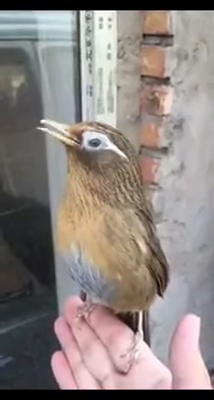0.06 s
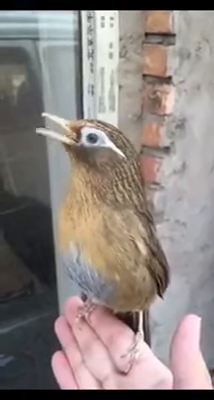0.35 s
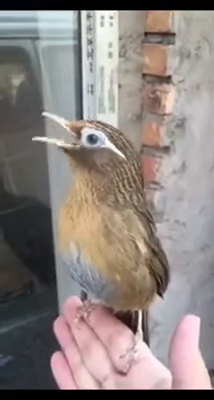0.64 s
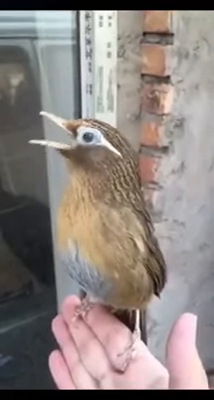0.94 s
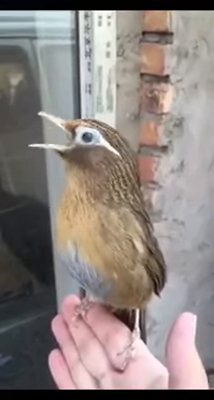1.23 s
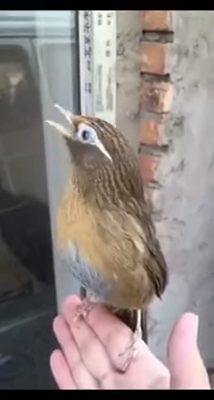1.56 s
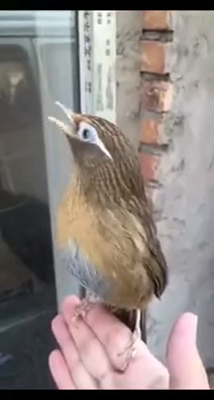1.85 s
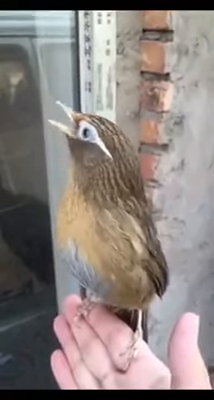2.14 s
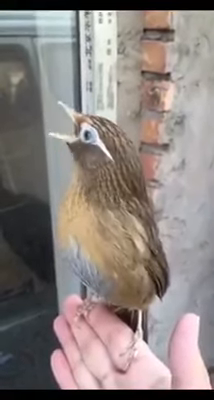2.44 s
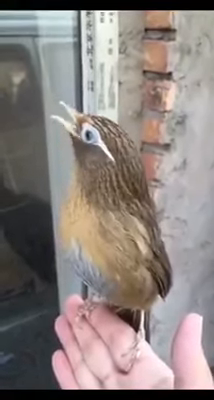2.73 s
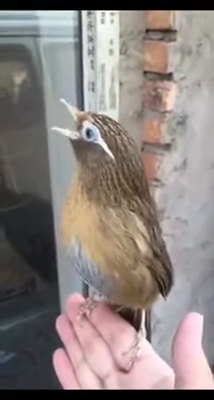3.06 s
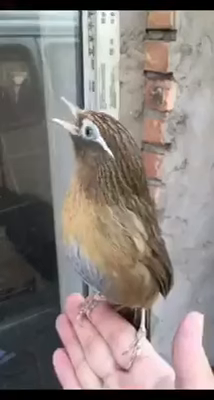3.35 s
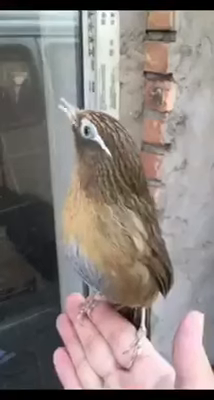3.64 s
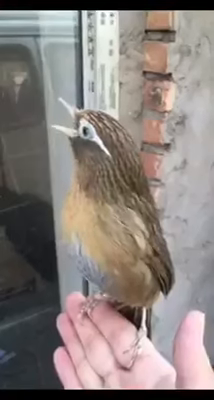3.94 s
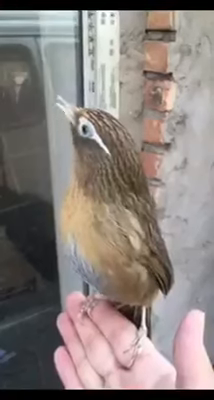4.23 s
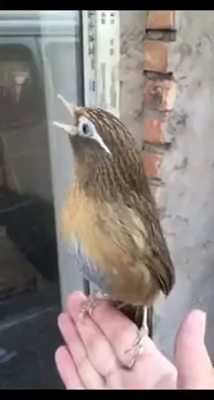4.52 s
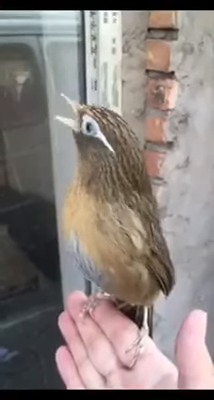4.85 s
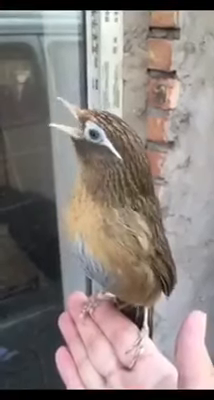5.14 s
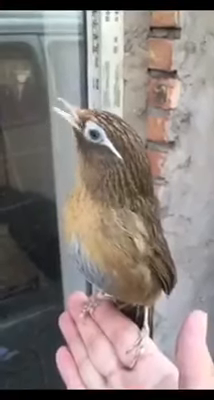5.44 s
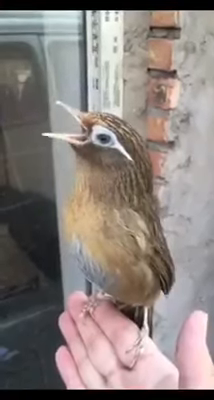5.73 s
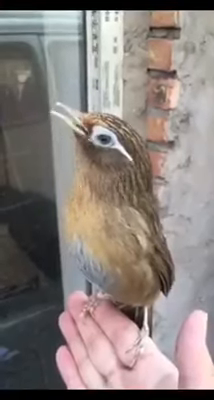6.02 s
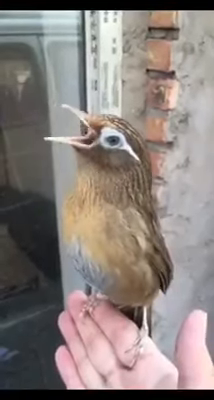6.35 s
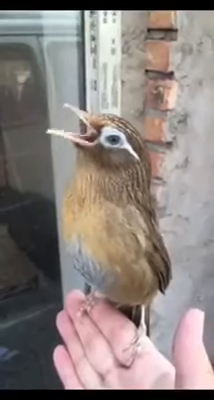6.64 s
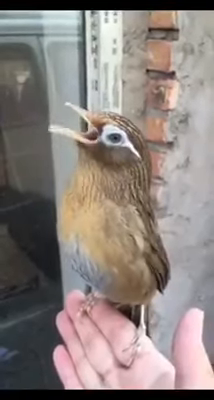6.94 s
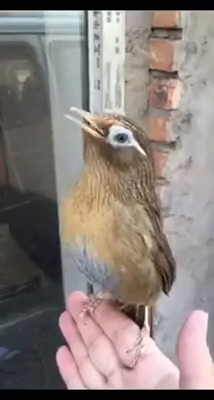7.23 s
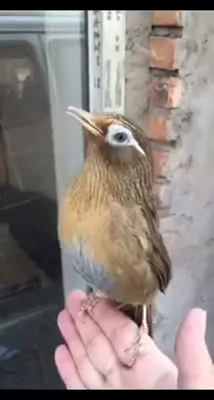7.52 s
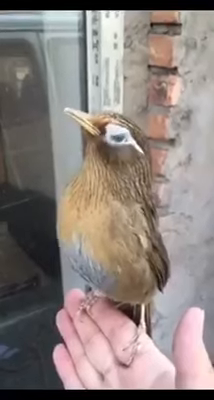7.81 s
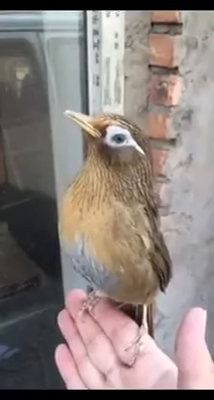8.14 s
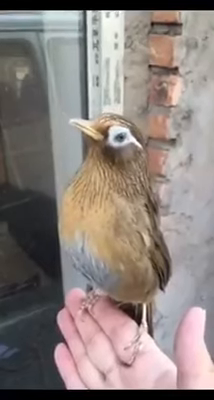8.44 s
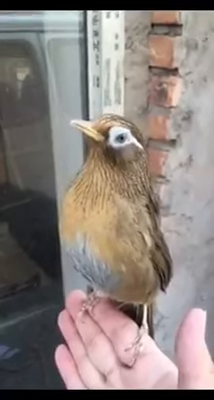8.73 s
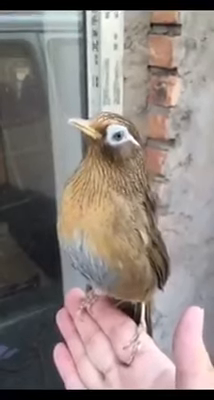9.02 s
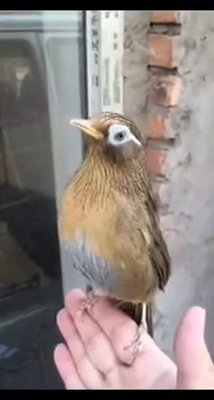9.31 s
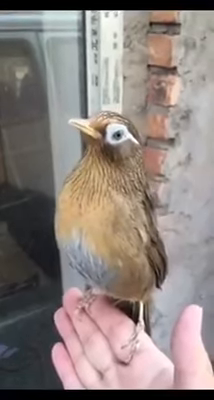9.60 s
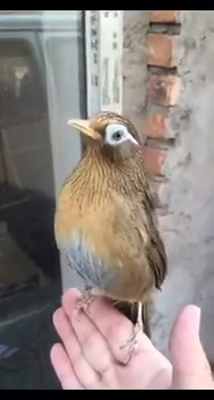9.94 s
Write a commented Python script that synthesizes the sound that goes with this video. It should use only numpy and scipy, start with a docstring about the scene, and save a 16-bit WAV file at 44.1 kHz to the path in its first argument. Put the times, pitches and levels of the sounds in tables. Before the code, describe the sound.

A songbird sings loudly, close to the microphone, with a short echo from nearby walls. From the start to about 3.5 seconds it delivers quick, high notes: soft arched calls, plunging trills, buzzy climbs and wobbling upward swoops, almost pure in tone with a slight breathy edge. From 3.5 to 5.5 seconds it repeats a pattern of a short chip, an upward leap and a falling trill. From about 5.7 seconds it sings harder, alternating clear, slightly rising whistles with drooping trills and sharp leaping notes, and stops at 7.3 seconds. From 7.7 to 9.8 seconds a farther bird answers with about a dozen much quieter, curving, buzzy chirps. A faint low rumble and a wash of air continue underneath, with soft, dull rustles around 8 and 9.2 seconds.

```python
"""Near some walls, a hwamei (a songbird) perched on a hand sings close by: quick trilled sweeps,
then long swooping whistles. Its voice organ, the syrinx, makes an almost pure tone that slides and
shakes in pitch; faint overtones and hiss surround it. It repeats a small stock of notes, and the
walls throw them back. When it stops, a farther bird answers over a low rumble and soft rustles."""
import sys
import numpy as np
from scipy import signal
from scipy.fft import rfft, irfft, next_fast_len
from scipy.io import wavfile
from scipy.ndimage import uniform_filter1d, minimum_filter1d

SR = 44100
rng = np.random.default_rng(int(sys.argv[2]) if len(sys.argv) > 2 else 0)


def master_out(mix):
    """Clip the mix to full scale and print it as 16-bit PCM to the path in sys.argv[1]."""
    frames = np.transpose(np.atleast_2d(mix))
    ceiling = np.clip(frames, -1, 1)
    pcm = np.round(ceiling * 32767).astype(np.int16)
    wavfile.write(sys.argv[1], SR, pcm)


N = 439677

# Breathy hiss around each note, with a bright top at 8-11 kHz: f/Hz, relative level/dB
HISS_SPECTRUM = [(400, -29), (1000, -19.5), (1500, -1.5), (2400, 14), (4200, -5), (5200, -1), (6300, 6.5),
                 (7000, -28), (7900, -8), (9500, -2), (11200, -6), (12400, -14)]


def amp(db):
    """Turns decibels into a factor to multiply a sound by."""
    return 10 ** (np.asarray(db) / 20)


def unit_level(x):
    """Scales a signal so that its average size (rms) is 1."""
    return x / np.sqrt(np.mean(x ** 2) + 1e-20)


def value_at(points, hz):
    """Reads between the rows of a (frequency, value) table, on a log-frequency axis."""
    f, value = np.transpose(points)
    return np.interp(np.log(hz + 1), np.log(f + 1), value)


def add(mix, start_s, sound):
    """Mixes a sound in at the given time."""
    part = mix[max(round(start_s * SR), 0):][:len(sound)]
    part += sound[:len(part)]


def waver(size, hz):
    """Random wavering of average size 1, mostly slower than hz."""
    padded = next_fast_len(size + 2048)
    f = np.fft.rfftfreq(padded, 1 / SR)
    slow = rfft(rng.standard_normal(padded)) / (1 + (f / hz) ** 2)
    return unit_level(irfft(slow, padded))[:size]


def noise(spectrum, size=N):
    """Noise of average size 1 with the given balance of low and high frequencies."""
    padded = next_fast_len(size)
    gain = amp(value_at(spectrum, np.fft.rfftfreq(padded, 1 / SR)))
    return unit_level(irfft(rfft(rng.standard_normal(padded)) * gain, padded)[:size])


def fade(t, edge_s):
    """Soft start and stop of a sound."""
    return np.sin(np.pi / 2 * np.clip(np.minimum(t, t[-1] - t) / edge_s, 0, 1)) ** 2


def reverb(x, stretch, build_s):
    """The surroundings ring on in a blur of echoes; high frequencies die first."""
    # f/Hz, time to die away by 60 dB before stretching/s
    ring_times = [(1000, 1), (2800, 0.89), (4000, 0.83), (11000, 0.048)]
    reflections = rng.standard_normal(SR) * (rng.random(SR) < .1)
    hz, t, bands = signal.stft(reflections, SR, nperseg=256)
    ring_s = stretch * value_at(ring_times, hz)[:, None]
    tail = signal.istft(bands * amp(-60 * t / ring_s), SR, nperseg=256)[1]
    tail *= 1 - np.exp(-(np.arange(len(tail)) / SR / build_s) ** 2)
    return signal.fftconvolve(x, tail / np.linalg.norm(tail))[:N]


def background(drift_db=1.93):
    """Low rumble and a wash of air, drifting a little in loudness together."""
    # Both: f/Hz, relative level/dB
    rumble_spectrum = [(15, -42.5), (25, -23), (33, -25), (41, 7), (47, 4.5), (56, 5), (74, -14), (92, 2),
                       (115, -9.5), (157, -18), (260, -47), (440, -100)]
    air_spectrum = [(88, -27), (150, -12), (200, -4), (300, -4.5), (420, -8), (520, -14), (680, -13),
                    (900, -13.5), (1330, -9), (2500, -10.5), (3450, -21), (4500, -23), (5500, -28.5),
                    (7850, -28.5), (13000, -53.5)]
    steady = amp(-44.5) * noise(rumble_spectrum) + amp(-54.5) * noise(air_spectrum)
    return steady * amp(drift_db * waver(N, 2.9))


def rustles():
    """Brief, uneven swells of dull noise."""
    # start/s, length/s, rough band centre/Hz, level/dB
    swells = [(4.426, 0.19, 421, -48.5), (8.011, .17, 610, -51), (9.154, 0.317, 244, -51.5),
              (9.165, 0.28, 685, -54.5)]
    out = np.zeros(N)
    for start, length, hz, db in swells:
        t = np.arange(0, length, 1 / SR)
        band_filter = signal.butter(2, [hz / 1.9, hz * 1.4], "bandpass", fs=SR)
        band = unit_level(signal.lfilter(*band_filter, rng.standard_normal(len(t))))
        add(out, start, amp(db + 2.9 * waver(len(t), 30)) * band * fade(t, 0.059))
    return out


def far_bird(buzz=0.043, buzz_hz=130, rasp=0.021):
    """Curving, buzzy notes, about half direct sound and half echo; high notes are the raspiest."""
    # start/s, length/s, first pitch/Hz, middle pitch/Hz, last pitch/Hz, relative level/dB
    answer_notes = [(7.702, 0.11, 1907, 1786, 1658, -50.5), (7.921, 0.15, 2040, 1936, 1954, -56.5),
                    (8.046, 0.11, 1836, 2076, 2175, -41), (8.254, 0.092, 2383, 2497, 2570, -42.5),
                    (8.348, 0.029, 2790, 3040, 3260, -30), (8.526, 0.094, 5730, 4730, 4230, -45.5),
                    (8.689, .11, 3530, 4070, 4300, -42.5), (8.812, 0.11, 3650, 2950, 2740, -39.5),
                    (9.036, 0.12, 2263, 2526, 2850, -36.5), (9.172, 0.16, 2810, 2680, 2420, -35.5),
                    (9.532, 0.092, 3320, 3710, 4280, -40), (9.681, 0.075, 3590, 2957, 2690, -36.5)]
    song = np.zeros(N)
    for start, length, first, middle, last, db in answer_notes:
        t = np.arange(0, length, 1 / SR)
        hz = np.polyval(np.polyfit([0, .5, 1], [first, middle, last], 2), t / length)
        hz *= 1 + hz / 3000 * (buzz * np.sin(2 * np.pi * buzz_hz * t) + rasp * waver(len(t), 510))
        phase = 2 * np.pi * np.cumsum(hz) / SR
        tone = np.sin(phase) + amp(-35.5) * np.sin(2 * phase)
        voice = tone + amp(-28) * noise(HISS_SPECTRUM, len(t))
        add(song, start, amp(db) * fade(t, 0.022) * voice)
    return amp(-5) * song + amp(-5.5) * reverb(song, stretch=0.51, build_s=0.014)


def hiss(hz, level_db, depth_hz):
    """Breathy hiss, stronger when a note is loud, trilled, far from mid pitch or falling fast."""
    octaves_off = np.abs(np.log2(hz / 2600))
    fall = np.maximum(-np.gradient(np.log2(hz)) * SR, 0)  # octaves per second
    rough_db = np.maximum(14 * np.tanh(depth_hz / 170), 15 * np.tanh(fall / 35))
    calm_db = .4 * level_db - 62
    hiss_db = calm_db + rough_db + 16 * octaves_off
    return amp(hiss_db + 2 * waver(len(hz), 150)) * noise(HISS_SPECTRUM, len(hz))


def fizz(hz, level_db, depth_hz, above_hz=5400, width_hz=330):
    """A narrow, bright fizz that rises and falls high above the sliding tone."""
    fizz_db = -54 + 0.47 * level_db + 13 * np.tanh(depth_hz / 120) + 17 * np.log2(hz / 2600)
    phase = 2 * np.pi * np.cumsum(hz + above_hz) / SR
    return amp(fizz_db) * waver(len(hz), width_hz) * np.sin(phase)


def overtones(phase, hz, flutter_db=4, blur_radians=0.3):
    """Faint, fluttering multiples of the pitch; half multiples come from strong and weak cycles."""
    # Made by the syrinx: multiple of the pitch, relative level/dB
    multiples = [(.5, -49), (1.5, -28.5), (2, -28), (2.5, -49.5), (3, -45.5), (3.5, -58), (4, -46)]
    # How bright the overtones sound at each frequency: f/Hz, gain/dB
    overtone_balance = [(800, -8), (1500, -1.5), (3500, -14), (4300, -19), (5000, -12), (5500, -7.5),
                        (6200, 2.5), (7000, -18.5), (7900, 5), (9000, 8.5), (11200, -4.5), (12400, -11.5)]
    out = np.zeros(len(hz))
    for multiple, db in multiples:
        gain = amp(db + flutter_db * waver(len(hz), 40) + value_at(overtone_balance, multiple * hz))
        wave = np.sin(multiple * phase + blur_radians * waver(len(hz), 310))
        out += gain * wave * (multiple * hz < SR / 2)
    return out


def syrinx(t, line_hz, level_db, depth_hz=0, trill_hz=0, *, bright_db, noise_db):
    """One breathy note: the pitch follows line_hz, and a trill swings it up and down by depth_hz."""
    # The tone carries best in the middle of the bird's range: f/Hz, gain/dB
    carrying = [(1500, -9.5), (1800, -6.5), (2200, -3.5), (2800, 0), (3500, -3), (4000, -5.5),
                (4500, -13.5), (5300, -12)]
    level_db = level_db + value_at(carrying, line_hz)
    trill = np.sin(2 * np.pi * np.cumsum(trill_hz * (1 + .017 * waver(len(t), 43))) / SR)
    # the harder the trill and the higher the note, the less steady the pitch
    swing_hz = depth_hz * (trill + 0.15 * waver(len(t), 450))
    shake = 0.0015 * (line_hz / 2600) ** 4 * waver(len(t), 400)
    hz = line_hz * (1 + shake) + swing_hz
    phase = 2 * np.pi * np.cumsum(hz) / SR
    tone = np.sin(phase) * (1 + amp(-52) * waver(len(t), 1300))
    tone += amp(bright_db) * overtones(phase, hz)
    # the tone weakens at the top of each trill swing
    pulse = np.maximum(1 - swing_hz / 620, .1) / np.sqrt(1 + (depth_hz / 800) ** 2)
    haze = hiss(line_hz, level_db, depth_hz) * fade(t, .007) + fizz(hz, level_db, depth_hz)
    return (np.sqrt(2) * amp(level_db) * pulse * tone + amp(noise_db) * haze) * fade(t, .003)


def swell(t, attack_s, release_s, quieter_db=20.5):
    """Loudness of a note in dB: it starts quieter, grows, holds and drops again."""
    return -quieter_db * (np.exp(-(t / attack_s) ** 1.25) + np.exp((t - t[-1]) / release_s))


def closing(t, drop, time_s):
    """A factor that lowers the pitch by the fraction drop as the note ends."""
    return 1 - drop * np.exp(-((t[-1] - t) / time_s) ** 2)


def arch(t, first_hz, top_hz, last_hz, top_at, db, bright_db):
    """A soft, clean note that rounds over its top pitch."""
    side = np.interp(t / t[-1], [0, np.clip(top_at, .05, .95), 1], [-1, 0, 1])
    end_hz = np.where(side < 0, first_hz, last_hz)
    hz = top_hz + (end_hz - top_hz) * np.sin(np.pi / 2 * abs(side)) ** 2.5
    level_db = db + swell(t, attack_s=0.016, release_s=0.0056)
    return syrinx(t, hz, level_db, bright_db=bright_db, noise_db=3.5)


def blip(hz=2750, drop=0.16, length_s=0.0066):
    """A tiny falling tone from the low side of the syrinx."""
    t = np.arange(0, length_s, 1 / SR)
    phase = 2 * np.pi * np.cumsum(hz * (1 - drop * t / length_s)) / SR
    return np.sqrt(2) * np.sin(phase) * fade(t, 0.0033)


def plunge(t, floor_hz, fall_s, trill_hz, trill_s, db):
    """The pitch plunges, then settles; the trill sets in at once and dies away."""
    hz = floor_hz + 2150 * np.exp(-(t / fall_s) ** 1.3) + 750 * np.exp(-t / 0.076)
    hz *= closing(t, drop=0.15, time_s=0.008)
    depth_hz = 220 * (1 - np.exp(-t / .015)) / (1 + (t / trill_s) ** 4)
    level_db = db - 14 * t + swell(t, attack_s=.011, release_s=.003)
    return syrinx(t, hz, level_db, depth_hz, trill_hz, bright_db=1, noise_db=-1.5)


def climb(t, first_hz, last_hz, trill_hz, db, depth_hz=245):
    """A rising note that buzzes with a very fast trill."""
    hz = first_hz + (last_hz - first_hz) * (t / t[-1]) ** 1.6
    level_db = db + swell(t, attack_s=0.031, release_s=0.0078)
    return syrinx(t, hz, level_db, depth_hz, trill_hz, bright_db=-3.5, noise_db=1)


def swoop(t, low_hz, offset_hz, bend, wobble_hz, db, top_hz=5350):
    """The pitch curls upward, wobbling most in the middle of its range."""
    progress = t / t[-1]
    hz = low_hz + offset_hz * np.exp(-t / 0.019) + (top_hz - low_hz) * progress ** bend
    depth_hz = 520 * np.exp(-((progress - 0.698) / .27) ** 2)
    level_db = db + swell(t, attack_s=.017, release_s=0.0018)
    return syrinx(t, hz, level_db, depth_hz, wobble_hz, bright_db=-5.5, noise_db=3)


def chip(t, pitch_hz, db):
    """A short note on one pitch that tips down at its end."""
    hz = pitch_hz * closing(t, drop=0.22, time_s=0.014)
    level_db = db + swell(t, attack_s=0.019, release_s=0.0051)
    return syrinx(t, hz, level_db, bright_db=-1.5, noise_db=-11.5)


def leap(t, leap_s, landing_hz, top_hz, last_hz, attack_s, db, low_hz=1500, snap_s=.02):
    """The pitch jumps up from a low murmur, creeps higher, then snaps up or down."""
    turn_s = t[-1] - snap_s
    creep_hz = (top_hz - landing_hz) * np.minimum(t / turn_s, 1) ** 3.2
    snap_hz = (last_hz - top_hz) * np.maximum(t - turn_s, 0) / snap_s
    high_hz = landing_hz + creep_hz + snap_hz
    hz = low_hz + (high_hz - low_hz) / (1 + np.exp((leap_s - t) / .0055))
    level_db = db + swell(t, attack_s, release_s=0.0016)
    return syrinx(t, hz, level_db, bright_db=-4.5, noise_db=9.5)


def whistle(t, first_hz, last_hz, db):
    """A long, clear note that drifts upward and dips as it ends."""
    hz = first_hz + (last_hz - first_hz) * t / t[-1]
    hz *= (1 + 0.0052 * waver(len(t), 30)) * closing(t, drop=0.088, time_s=0.0069)
    level_db = db + swell(t, attack_s=.007, release_s=.003)
    return syrinx(t, hz, level_db, bright_db=3, noise_db=-2)


def droop(t, first_hz, last_hz, db, trill_hz=165):
    """After a quick slide down, the pitch sinks ever faster while the trill deepens."""
    progress = t / t[-1]
    hz = first_hz + (last_hz - first_hz) * progress ** 3.7 + 260 * np.exp(-t / 0.032)
    depth_hz = 220 * np.sin(np.pi / 2 * progress) ** 2
    level_db = db + swell(t, attack_s=0.015, release_s=0.012)
    return syrinx(t, hz, level_db, depth_hz, trill_hz, bright_db=0.5, noise_db=0.5)


def near_bird():
    """The hwamei's song and its echoes off the hand and walls; note levels are relative."""
    # start/s, length/s, first/Hz, top/Hz, last/Hz, place of the top (0-1), level/dB, overtones/dB
    arches = [(0, 0.083, 2170, 2498, 2320, 0.93, -9.5, 1), (0.108, 0.036, 2820, 3024, 2300, 0.32, -5, 2),
              (0.165, 0.12, 1953, 1974, 1643, 0.02, -12.5, 2.5),
              (.268, 0.12, 1680, 2197, 1690, 0.58, -9, 0), (2.24, 0.14, 2270, 2446, 1891, 0.2, -5, -6),
              (2.927, 0.13, 2290, 2396, 1746, 0.41, -1.5, -5.5)]
    # start/s, length/s, settles toward/Hz, fall time/s, trill rate/Hz, trill lasts/s, level/dB
    plunges = [(0.502, 0.083, 2175, 0.015, 148, 0.088, -10.5), (0.797, .087, 2295, 0.019, 161, .2, -9),
               (1.099, .1, 2342, 0.02, 142.5, 0.6, -6), (1.529, .17, 2470, 0.016, 119, 0.15, -6.5),
               (2.02, 0.17, 2468, 0.019, 124, 0.18, -6), (2.686, .182, 2419, 0.015, 95, 0.11, -3.5),
               (3.388, 0.21, 2447, .019, 111.5, 0.12, -7), (3.967, .222, 2477, 0.021, 153, 0.057, -4.5),
               (4.57, 0.22, 2444, 0.02, 150, 0.06, -9), (5.148, 0.22, 2487, 0.023, 148, 0.057, -11)]
    # start/s, length/s, first/Hz, last/Hz, trill rate/Hz, level/dB
    climbs = [(0.634, .11, 3574, 4900, 207.5, -5), (.944, .1, 3546, 4830, 199.5, -2.5)]
    # start/s, length/s, low/Hz, starts higher by/Hz, bend (a power), wobble rate/Hz, level/dB
    swoops = [(1.263, 0.19, 2960, 330, 2.94, 42, -8), (1.76, .19, 2655, 28, 2.09, 38, -6.5),
              (2.431, 0.17, 2689, -57.5, 2.4, 40.5, -4), (3.129, 0.18, 2698, -88.5, 2.27, 41, -4.5)]
    # start/s, length/s, f/Hz, level/dB
    chips = [(3.647, 0.08, 2745, -1), (4.23, 0.064, 2735, -3.5), (4.829, 0.061, 2735, -6),
             (5.424, 0.062, 2751, -9)]
    # start/s, length/s, leap after/s, lands on/Hz, creeps to/Hz, last/Hz, attack/s, level/dB
    leaps = [(3.799, .11, 0.013, 3318, 3696, 4260, 0.028, -5),
             (4.384, 0.1, 0.0084, 3370, 3740, 4055, 0.038, -1),
             (4.977, 0.1, 0.01, 3470, 3640, 3990, 0.038, -5.5),
             (5.557, 0.13, 0.016, 3490, 3695, 2340, 0.025, -14),
             (6.221, .134, 0.056, 3710, 3997, 2284, 0.085, -8),
             (6.918, 0.14, 0.055, 3690, 4020, 2216, 0.093, -9)]
    # Both: start/s, length/s, main slide from/Hz, to/Hz, level/dB
    whistles = [(5.72, 0.19, 2594, 2829, -6.5), (6.39, 0.2, 2570, 2857, -9),
                (7.095, 0.19, 2532, 2843, -11.5)]
    droops = [(5.988, 0.17, 2968, 2103, -9.5), (6.664, .176, 2972, 2082, -12)]
    # The bird eases off, then sings ever harder: t/s, gain/dB
    effort = [(0, 8.5), (2.5, -2), (4, 4), (5.4, 9.5), (6.1, 10.5), (7.3, 11)]
    # Echoes off nearby surfaces: delay/s, gain/dB
    echoes = [(.0011, -31), (.0034, -16.5), (.0057, -26.5), (.0083, -14.5), (0.017, -17), (0.022, -26),
              (0.026, -36.5)]
    song = np.zeros(N)
    for kind, rows in [(arch, arches), (plunge, plunges), (climb, climbs), (swoop, swoops),
                       (chip, chips), (leap, leaps), (whistle, whistles), (droop, droops)]:
        for start, length, *note in rows:
            add(song, start, kind(np.arange(0, length, 1 / SR), *note))
    for start, *_ in plunges:
        add(song, start - .001, amp(-22.5) * blip())
    song *= amp(np.interp(np.arange(N) / SR, *np.transpose(effort)))
    heard = song.copy()
    for delay, db in echoes:
        add(heard, delay, amp(db) * song)
    long_tail = amp(-38.5) * reverb(song, stretch=1.1, build_s=.02)
    short_tail = amp(-27.5) * reverb(song, stretch=0.19, build_s=0.0087)
    return heard + short_tail + long_tail


def scene():
    """Both birds and the background at one microphone."""
    return (near_bird() + far_bird() + background() + rustles())[None]


def gain_control(x, ceiling_db=-9, hold_s=0.47, recover_db_per_s=46):
    """Loud notes turn everything down, background too; the volume waits, then comes back."""
    power_db = 10 * np.log10(abs(uniform_filter1d(x ** 2, size=2600)) + 1e-12)
    needed_db = np.minimum(ceiling_db - power_db, 0)
    hold = round(hold_s * SR)
    held_cut_db = -minimum_filter1d(needed_db, hold, origin=(hold - 1) // 2)
    recovery_db = recover_db_per_s * np.arange(N) / SR
    cut_db = np.maximum.accumulate(held_cut_db + recovery_db) - recovery_db
    return x / amp(uniform_filter1d(cut_db, size=1300))


def record(dry, limit=.87, cutoff_hz=13000):
    """After gain control, a quick limiter rounds off the loudest swells and the top treble is cut."""
    held = gain_control(dry[0])
    envelope = uniform_filter1d(np.abs(signal.hilbert(held, next_fast_len(N))[:N]), size=24)
    limited = held / (1 + (envelope / limit) ** 8) ** (1 / 8)
    lowpass = signal.firwin(401, cutoff_hz, window=("kaiser", 9), fs=SR)
    return signal.oaconvolve(limited, lowpass, "same")[None]


dry = scene()
out = record(dry)
master_out(out)
```